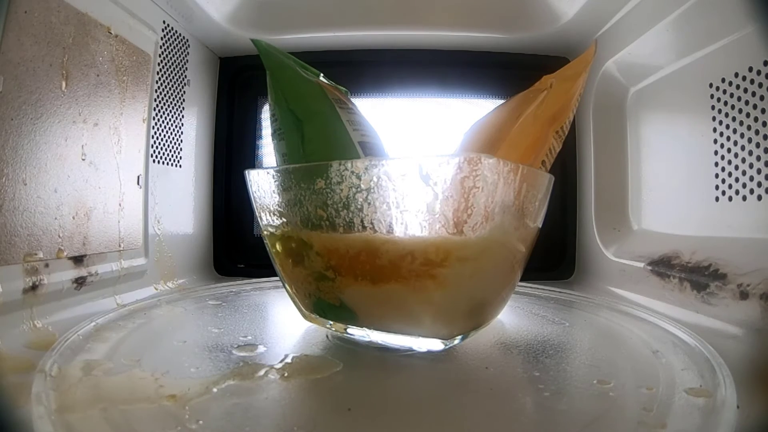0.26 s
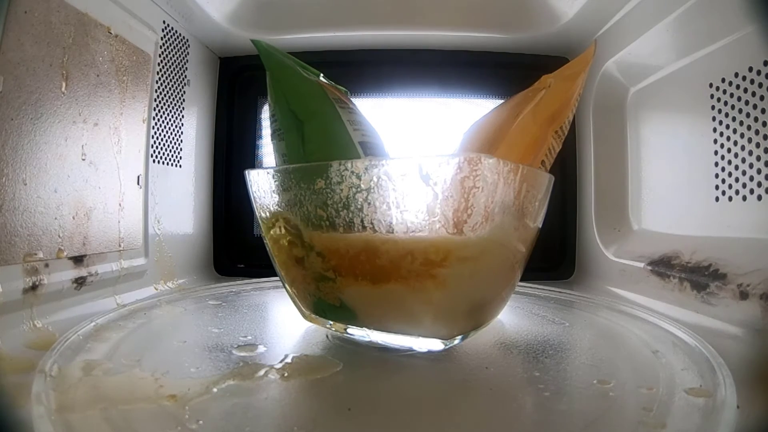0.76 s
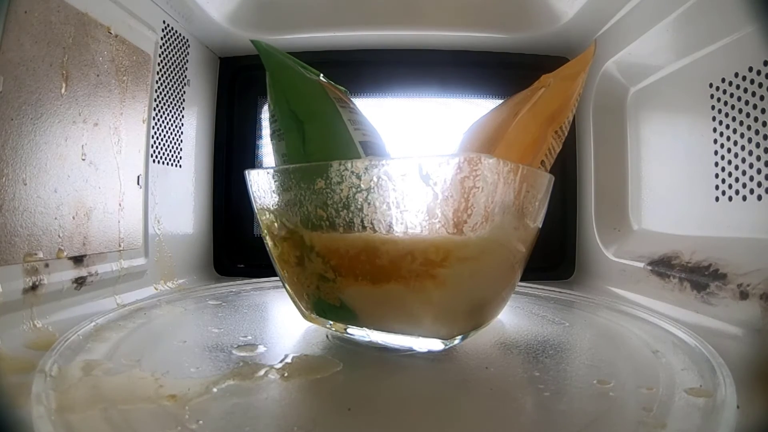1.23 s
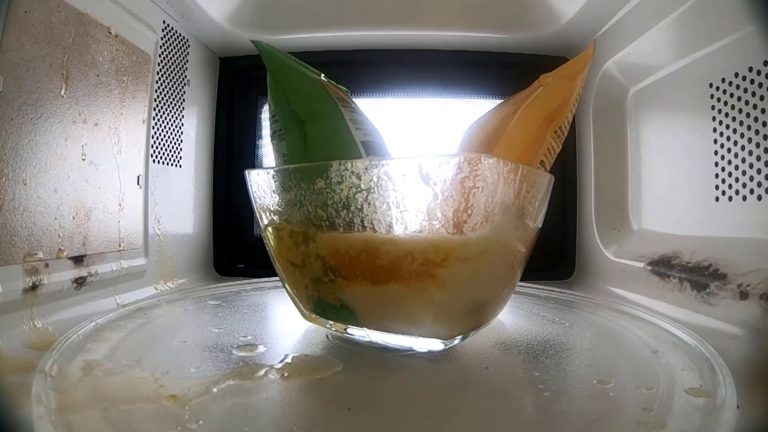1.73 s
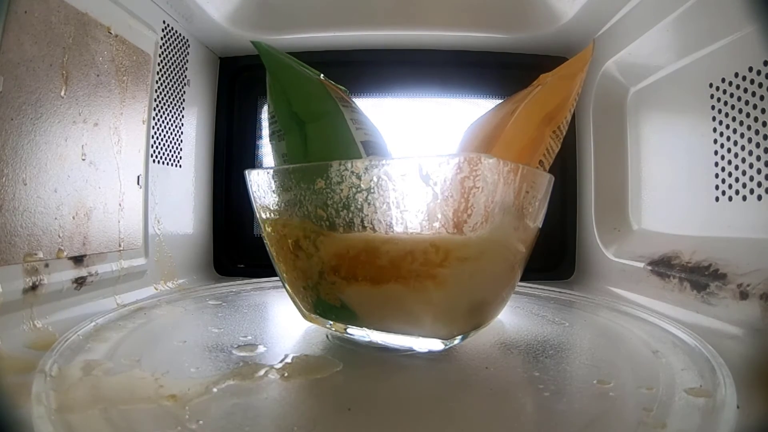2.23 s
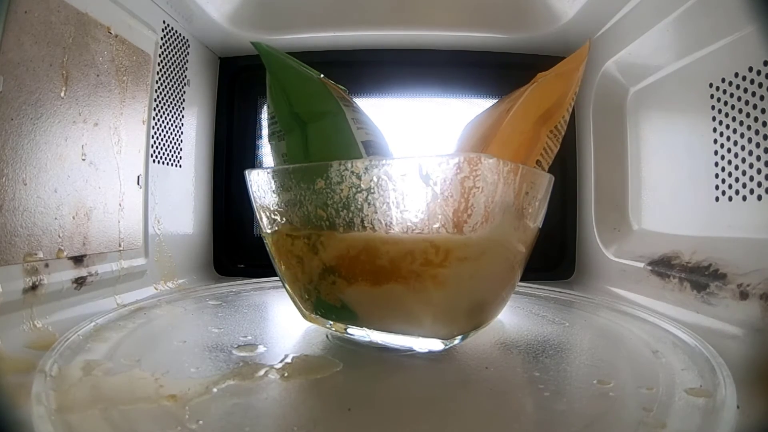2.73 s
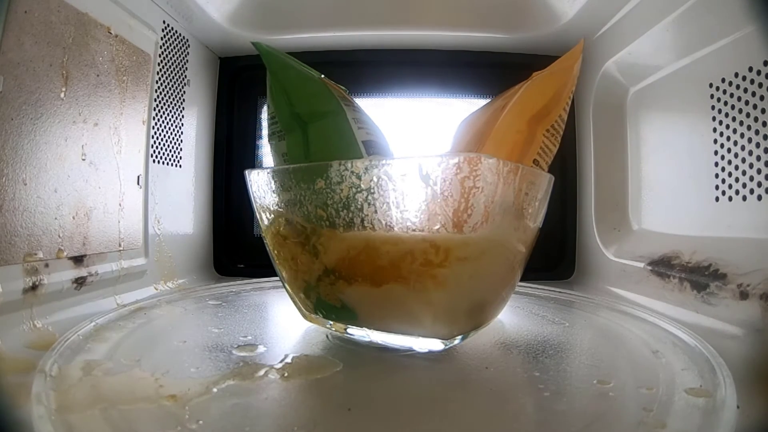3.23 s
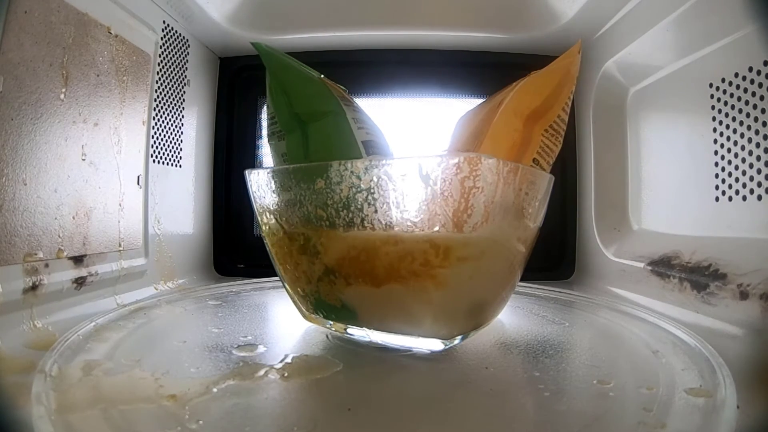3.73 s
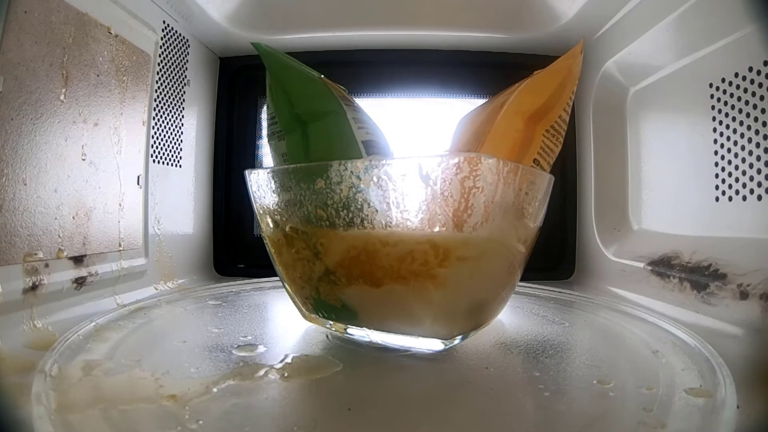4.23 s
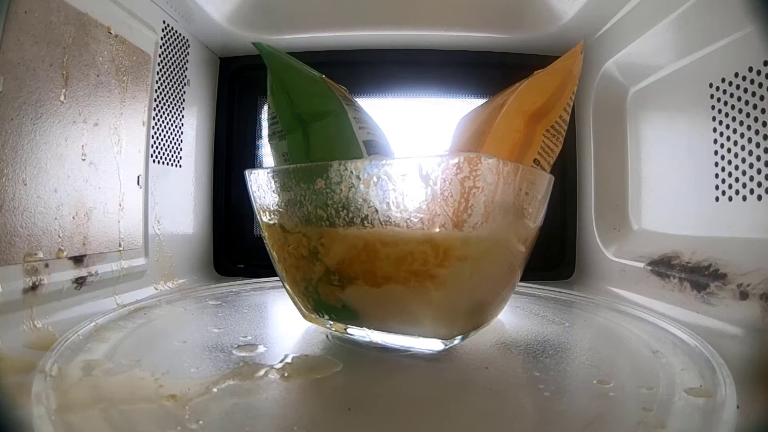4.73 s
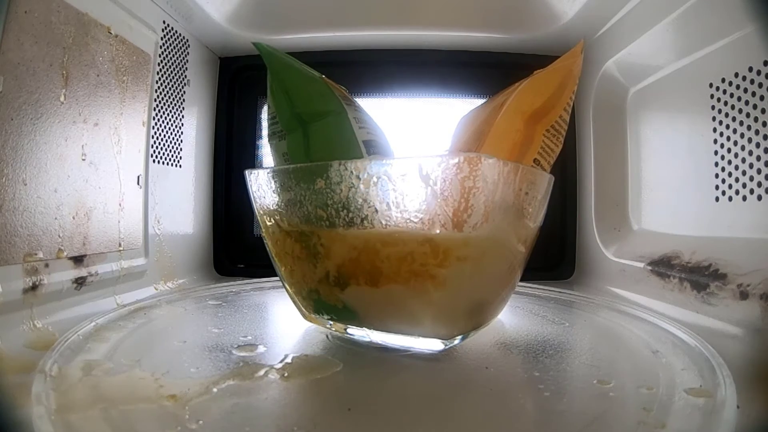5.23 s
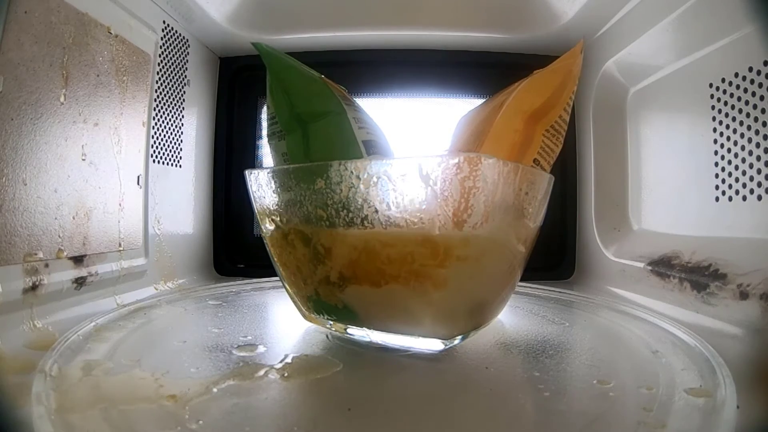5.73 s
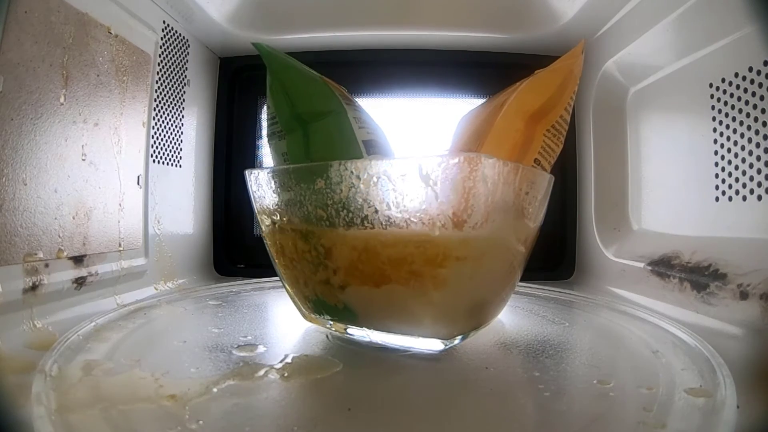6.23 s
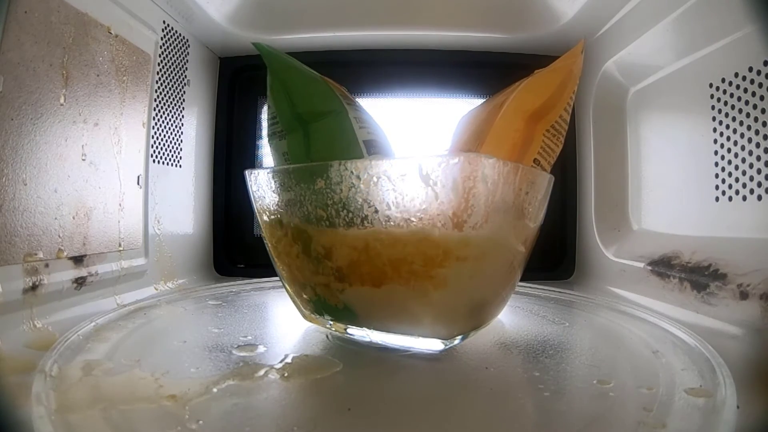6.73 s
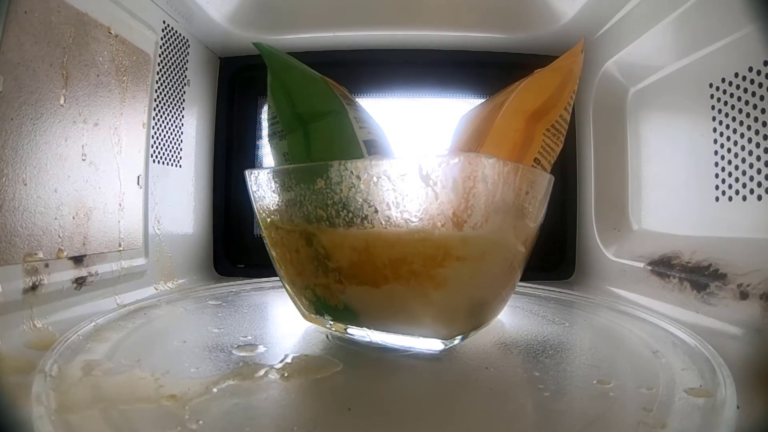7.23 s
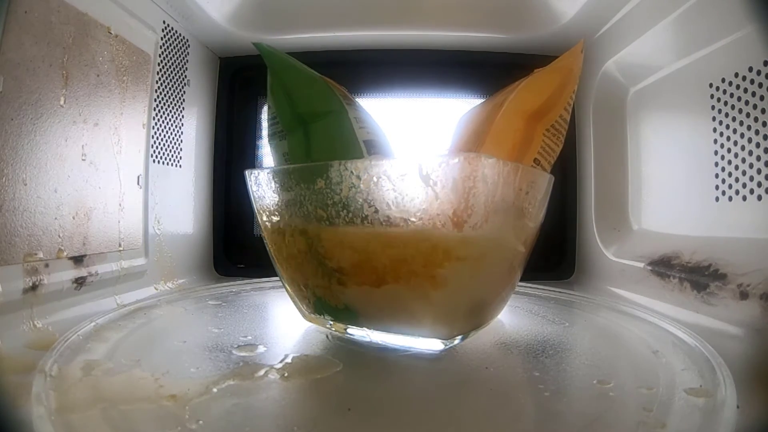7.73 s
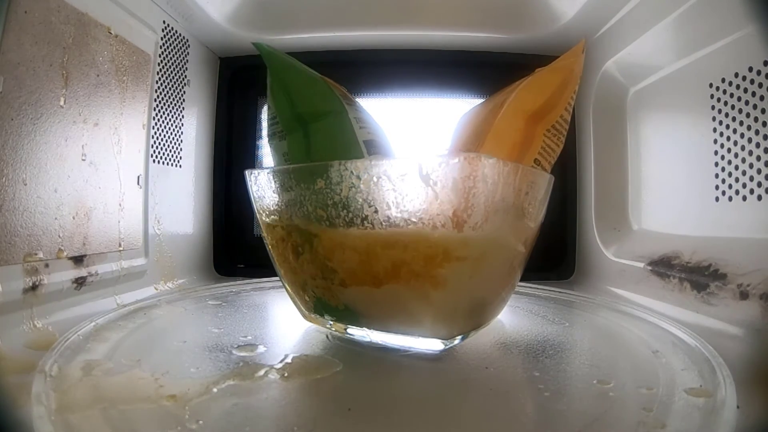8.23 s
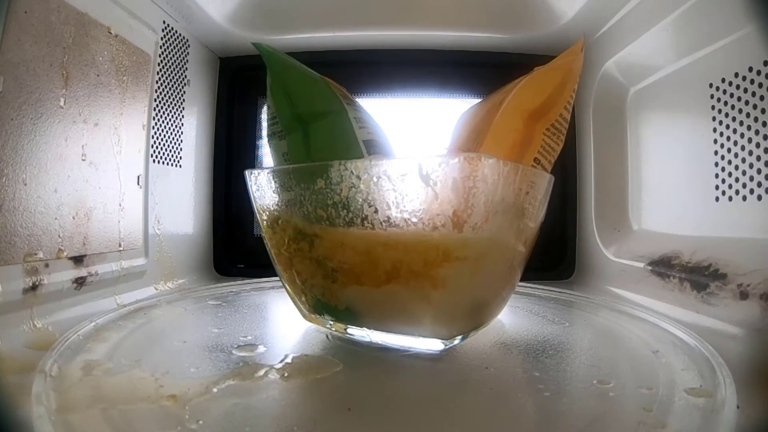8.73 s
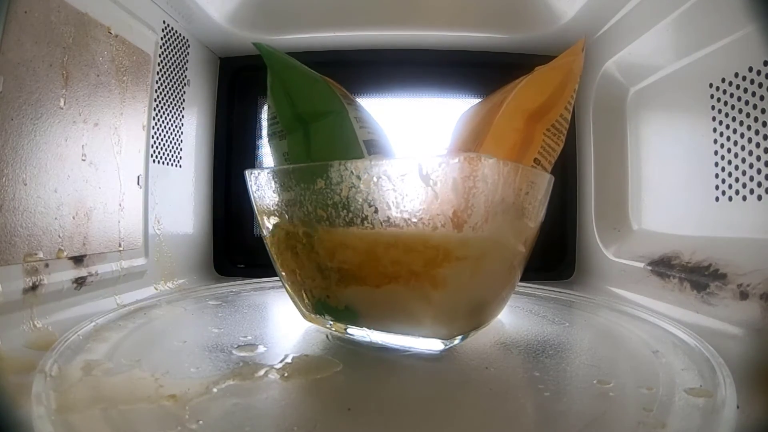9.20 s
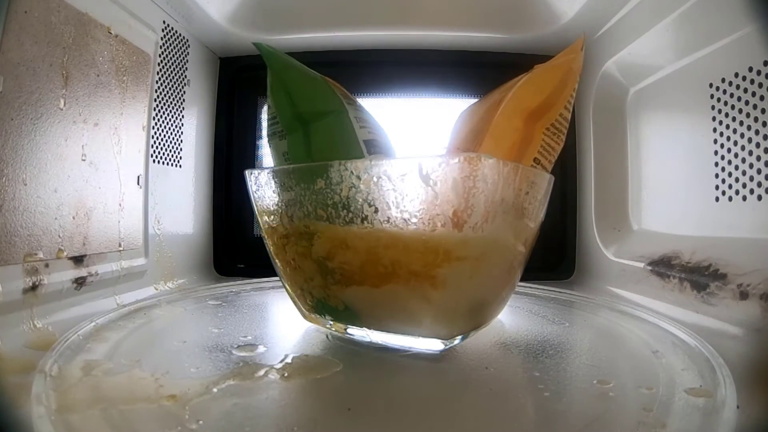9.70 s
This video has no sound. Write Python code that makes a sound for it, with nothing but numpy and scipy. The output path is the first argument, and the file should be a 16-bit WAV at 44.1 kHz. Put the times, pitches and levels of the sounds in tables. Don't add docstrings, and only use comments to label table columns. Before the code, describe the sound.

Inside a running microwave oven, a steady low mains hum and fan drone with a fast metallic rattle, rushing air and occasional faint food spits.

```python
import sys
import numpy as np
from scipy import signal
from scipy.fft import rfft, irfft, next_fast_len
from scipy.io import wavfile
from scipy.ndimage import uniform_filter1d, map_coordinates

SR = 44100
rng = np.random.default_rng(int(sys.argv[2]) if len(sys.argv) > 2 else 0)


def makeup_ratio(level_db):
    decades = np.asarray(level_db, float) / 20
    return 10 ** decades


def to_wav(s):
    ch = np.atleast_2d(s).T
    pcm = np.round(np.clip(ch, -1, 1) * 32767)
    wavfile.write(sys.argv[1], SR, pcm.astype(np.int16))


N = 439236
T = np.arange(N) / SR

MAINS_HZ, MAINS_START_TURNS, SHAFT_HZ = 49.9757, -.229, 43.5
MIXED_LEAD_RAD = 2.58
GUST_DB, GUSTS_PER_S = 0.5, 5.5
SURGE_DB, SURGE_AT_HALF_CYCLES = 1.5, 0.69

# pitch_hz, left_db, right_db
WHINES = [(5900, -100, -112), (7000, -101, -101)]
# freq_hz, left_db, right_db
RUMBLE_SPECTRUM = [(20, -67.5, -86), (35, -76, -77), (59, -80, -73), (88.5, -54, -49.5), (116, -59, -62.5),
                   (132, -51, -60), (174, -66.5, -56.5), (190, -65.5, -55.5), (265.4, -65.5, -51),
                   (286, -71, -65), (331, -66.5, -66), (331, -65, -61.5), (434, -77.5, -66.5),
                   (1210, -140, -140)]
# freq_hz, left_db, right_db
HISS_SPECTRUM = [(288, -110, -110), (515, -81, -75.5), (1700, -91, -87.5), (2800, -91.5, -99),
                 (2660, -101, -104), (4070, -106, -108), (4370, -113, -104), (4700, -115, -114),
                 (5500, -118, -113), (7500, -112, -111), (7700, -116, -119), (9400, -125, -126),
                 (11100, -150, -150)]
# freq_hz, likeness_0_to_1, left_lead_rad, casing_left_minus_right_db
PORTS = [(40, 0.05, 1.4, 2.5), (86.5, 0.9, 3.2, 2.5), (151, 0.5, 3.2, -7), (267, .85, 2.7, -10.5),
         (320, 0.3, 2.6, -10.5), (567, 0.9, 2.09, -3), (865, 0, 2.62, -1), (1550, 0.95, 2.08, 0.9),
         (1890, 0.2, 2.2, 11), (2030, 1, 2.53, -0.5), (2490, 0.9, 1.9, 4.5), (3120, 0, 1.5, -4.5),
         (4000, 0.87, 0.27, -4), (5500, 0.2, 2.6, -1.5), (7850, 0.3, 5, 1)]
# start_s, peak_db, pitch_hz, left_minus_right_db
SPITS = [(0.523, -66.5, 3386, -5), (3.072, -66.5, 3364, -5), (3.663, -62.5, 3160, 6), (3.8, -61, 3330, -8),
         (3.871, -56, 3520, 7), (5.186, -61, 3260, 0.5), (5.841, -62, 2910, -4.5), (5.842, -68, 5870, -6.5),
         (5.887, -61.5, 3310, 10), (5.913, -56.5, 2805, -2.5), (5.915, -72.5, 7120, 1.5),
         (6.081, -81.5, 6590, 10), (6.238, -58.5, 2906, 1), (6.24, -70, 5750, -7), (6.4, -73.5, 5500, -1),
         (7.276, -62.5, 3300, -3.5), (7.287, -67.5, 6360, 3), (7.365, -60, 3270, -5),
         (7.424, -64.5, 2490, 5.5)]
# freq_hz, width_hz, level_db, polarity_at_rotor
CASING_MODES = [(640, 22, -6, 1), (690, 22, -6, 1), (740, 28, -9, -1), (785, 24, -7, 1), (826, 30, -1, 1),
                (880, 30, -3, 1), (935, 40, -3, 1), (990, 28, -5, 1), (1038, 26, -4, 1), (1095, 34, -4, 1),
                (1145, 26, -5, 1), (1215, 22, -8, -1), (1250, 16, -9, -1), (1300, 20, -6, 1),
                (1342, 28, -2, 1), (1398, 75, 0, 1), (1445, 75, -1.5, 1), (1528, 36, -1.5, 1),
                (1570, 22, -9, -1), (1820, 40, -14, -1), (1950, 40, -12, 1), (2060, 60, -10, 1),
                (2150, 50, -13, 1), (2215, 50, -15, 1), (2300, 60, -19, 1), (2560, 60, -27, -1),
                (2750, 60, -28, 1), (3400, 100, -38, -1)]
# freq_hz, gain_db
CASING_PATH = [(400, -19.5), (600, -1), (900, 3.5), (1200, -2.5), (1450, 0), (1620, -16), (1900, 0),
               (2150, -2), (2400, -17), (2800, -14), (3500, -22.5), (5000, -46), (9000, -69.5)]
# freq_hz, delay_s
CASING_DELAY = [(750, -.0005), (1100, .0008), (1250, .002), (1430, .0007), (1620, .002), (1800, .0032),
                (2050, .002), (2350, .001)]
# time_s, lead_turns
SHAFT_LEAD = [(0.0, 0.405), (0.25, 0.361), (0.85, 0.14), (1.15, 0.068), (2.65, -0.24), (2.95, -0.256),
              (3.55, -0.143), (4.45, -0.048), (5.2, -0.092), (6.3, 0.005), (6.7, 0.0), (7.45, -0.041),
              (8.35, -0.051), (9.25, -0.1), (9.96, -0.105)]
# time_s, blade_tone_db
BLADE_LOAD = [(0.0, -36.5), (1.5, -36), (2.2, -35.5), (3.0, -39), (5.3, -38.5), (6.3, -37.5), (7.3, -39.5),
              (8.2, -38.5), (9.96, -37.5)]
# time_s, left_db, right_db, left_turn_rad, right_turn_rad
HUM_SETTLING = [
    (0, -1, 0, 0, 0.12),
    (8.847, 0.5, 0.5, 0, 0.22),
    (9.0, 4, -1.5, 0.43, .45),
    (9.5, 1.5, -0.5, 0.32, 0.28),
    (9.96, 3, -2, .4, 0.18),
]
# mains_multiple, left_db, right_db, left_lead_rad
MAINS_TONES = [(1, -61, -53, 2.4), (2, -32, -23, 3.1), (3, -51, -32, 2.6), (4, -37, -34, -1.3),
               (5, -47, -39, 2.6), (6, -49, -65, 0.9), (7, -56, -47, 2.4), (8, -57, -48, -2.3),
               (10, -62, -57, 2.5), (14, -62, -57, 2.5), (16, -67, -62, 2.8), (24, -63, -60, 2.7)]
# shaft_multiple, left_db, right_db, left_lead_rad
SHAFT_TONES = [(1, -45, -47, -2.5), (2, -44, -37, 2.4), (3, -41, -43, -2.0), (4, -40, -49, -2.5),
               (5, -66, -49, -2.8), (6, -41, -28, 2.6), (17, -73, -61, 3.1), (18, -57, -55, 2.3)]
# mains_multiple, shaft_multiple, left_db, right_db
MIXED_TONES = [(1, 5, -61, -48), (1, 18, -60, -57), (2, 2, -52, -39), (2, 3, -45, -35), (2, 4, -63, -48),
               (2, 7, -69, -55), (2, 15, -66, -62), (2, 17, -62, -60), (2, 18, -56, -56), (3, 1, -54, -41),
               (3, 2, -50, -42), (3, 3, -57, -49), (4, -2, -61, -50), (4, 1, -52, -42), (4, 17, -63, -63),
               (5, -1, -60, -52), (5, 1, -63, -54), (5, 9, -67, -62), (5, 17, -61, -63), (5, 18, -63, -63),
               (6, 17, -62, -62)]


def along(points, hz):
    f, *cols = np.transpose(points)
    return np.array([np.interp(np.log(hz + 1), np.log(f + 1), c) for c in cols])


def wobble(knots_per_s):
    knots = rng.standard_normal(int(N * knots_per_s / SR) + 4)
    return map_coordinates(knots, [T * knots_per_s])


def filtered(x, response):
    m = next_fast_len(N + SR // 2)
    return irfft(rfft(x, m) * response(np.fft.rfftfreq(m, 1 / SR)), m)[..., :N]


def apart(hz):
    return np.exp(.5j * along(PORTS, hz)[1] * [[1], [-1]])


def angles():
    lead_turns = uniform_filter1d(np.interp(T, *np.transpose(SHAFT_LEAD)), SR // 4)
    return MAINS_HZ * T + MAINS_START_TURNS, SHAFT_HZ * T + lead_turns


def whine():
    out = np.zeros((2, N))
    for pitch_hz, left_db, right_db in WHINES:
        level = makeup_ratio(np.array([[left_db], [right_db]]) + 3 * wobble(8))
        out += level * np.sin(2 * np.pi * pitch_hz * T + 2.5 * wobble(24))
    return out


def rush(spectrum):
    def turn(hz):
        return np.arccos(np.clip(along(PORTS, hz)[0], 0, 1)) / 2

    def gain(hz):
        return makeup_ratio(along(spectrum, hz)) * np.sqrt(SR / 2) * apart(hz)

    shared = filtered(rng.standard_normal(N), lambda hz: gain(hz) * np.cos(turn(hz)))
    opposed = filtered(rng.standard_normal(N), lambda hz: gain(hz) * np.sin(turn(hz)) * [[1], [-1]])
    return shared + opposed


def air():
    rumble = makeup_ratio(.7 * wobble(6)) * rush(RUMBLE_SPECTRUM)
    hiss = makeup_ratio(0.78 * wobble(12) + 0.13 * wobble(2.0)) * rush(HISS_SPECTRUM)
    return rumble + hiss


def spits():
    size = 600
    out, t = np.zeros((2, N + size)), np.arange(size) / SR
    for start_s, peak_db, pitch_hz, pan_db in SPITS:
        flutter = rng.standard_normal((2, size))
        flutter = uniform_filter1d(flutter, round(3 * SR / pitch_hz), axis=1)
        angle = 2 * np.pi * pitch_hz * t
        tone = flutter[0] * np.sin(angle) + flutter[1] * np.cos(angle)
        envelope = makeup_ratio(peak_db + 7.5) * t / 0.0012 * np.exp(1 - t / 0.0036)
        first = round(start_s * SR)
        out[:, first:first + size] += envelope * tone * makeup_ratio([[pan_db / 2], [-pan_db / 2]]) * [[1], [-1]]
    return out[:, :N]


def knocks(mains, shaft, at_turns, level_db, free_turns, miss_db):
    hit = np.flatnonzero(np.diff(np.floor(shaft - at_turns)) > 0)
    chance = rng.standard_normal((len(hit), 2))
    first, second = [np.sin(np.pi * (mains[hit] - free)) for free in free_turns]
    pull = np.abs(first * second)
    surge_db = SURGE_DB * np.cos(2 * np.pi * (2 * mains[hit] - SURGE_AT_HALF_CYCLES))
    size = makeup_ratio(miss_db) + np.tanh(pull / .4)
    size = size * makeup_ratio(level_db + surge_db + 1.1 * chance[:, 0])
    jitter = (9 * chance[:, 1]).astype(int)
    return np.bincount(np.clip(hit + jitter, 0, N - 1), size, N)


def blunt(f):
    highpass = ((1j * f / 750) / (1 + 1j * f / 750)) ** 2
    return highpass / (1 + (f / 2700) ** 6)


def panels(f):
    modes = 0
    for c, w, db, polarity in CASING_MODES:
        modes = modes + polarity * makeup_ratio(db) * 1j * f * w / (c * c - f * f + 1j * f * w)
    hz, w = 1430, 330
    late = (hz * hz - f * f - 1j * f * w) / (hz * hz - f * f + 1j * f * w)
    gain_db = along(CASING_PATH, f) + along(PORTS, f)[2] * [[.5], [-.5]]
    delay_turns = np.cumsum(along(CASING_DELAY, f)[0]) * f[1]
    return modes * late * makeup_ratio(gain_db) * apart(f) * np.exp(-2j * np.pi * delay_turns)


def casing(mains, shaft):
    blows = knocks(mains, shaft, .815, 10, (.53, .98), miss_db=-26)
    rebounds = knocks(mains, shaft, .235, -3, (.62, .98), miss_db=-10)
    blows = filtered(blows + rebounds, blunt)
    buzz = makeup_ratio(-8.5) * (np.diff(np.floor(mains), prepend=0) > 0)
    chatter = makeup_ratio(-12.5 + 4.55 * rng.standard_normal(N)) * rng.choice([-1, 1], N)
    chatter = chatter * (rng.random(N) < .009)
    return filtered(blows + buzz + chatter, panels)


def load_db():
    curve = np.interp(T, *np.transpose(BLADE_LOAD))
    return curve - curve.mean() + GUST_DB * wobble(GUSTS_PER_S)


def hum(mains, shaft):
    time_s, *cols = np.transpose(HUM_SETTLING)
    settle = np.array([np.interp(T, time_s, c) for c in cols])
    tones = [(m, 0, *row) for m, *row in MAINS_TONES]
    tones += [(0, *row) for row in SHAFT_TONES]
    tones += [(*row, MIXED_LEAD_RAD) for row in MIXED_TONES]
    out = np.zeros((2, N))
    for m, k, left_db, right_db, lead_rad in tones:
        angle = 2 * np.pi * (m * mains + k * shaft + rng.random())
        angle = angle + np.array([[lead_rad / 2], [-lead_rad / 2]])
        main = (m, k) == (2, 0)
        if (m, k) == (0, 6):
            waver_db = load_db()
        else:
            waver_db = (.25 if main else .8 if k == 0 else 1.5) * wobble(5)
        level_db = np.array([[left_db], [right_db]]) + waver_db + main * settle[:2]
        out += np.sqrt(2) * makeup_ratio(level_db) * np.cos(angle + main * settle[2:])
    return out


def scene():
    mains, shaft = angles()
    return whine() + air() + spits() + casing(mains, shaft) + hum(mains, shaft)


def low_pass(x):
    return signal.sosfilt(signal.butter(12, 9880, fs=SR, output="sos"), x)


def record(dry):
    return low_pass(dry)


dry = scene()
out = record(dry)
to_wav(out)
```